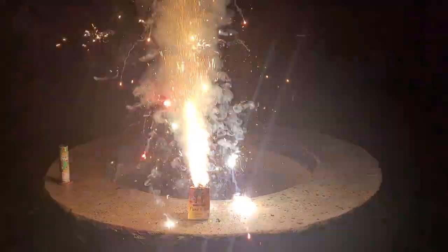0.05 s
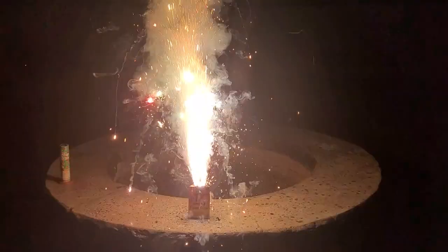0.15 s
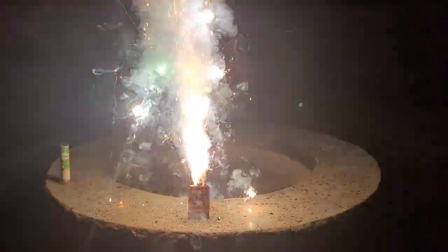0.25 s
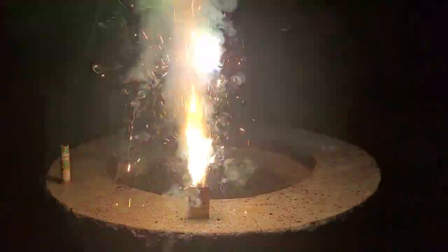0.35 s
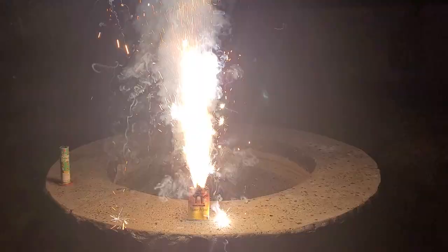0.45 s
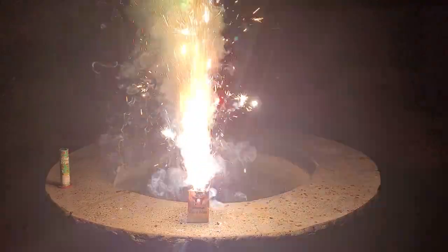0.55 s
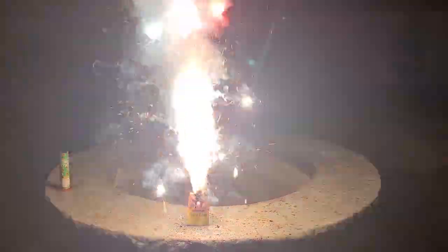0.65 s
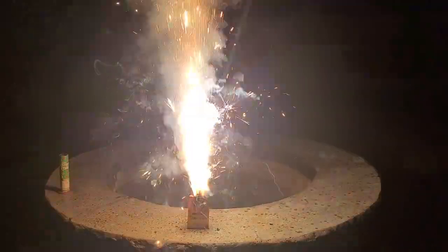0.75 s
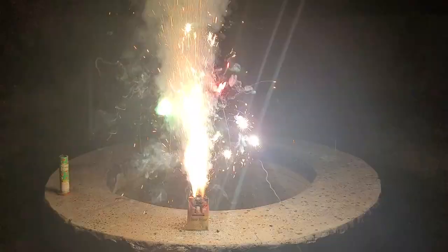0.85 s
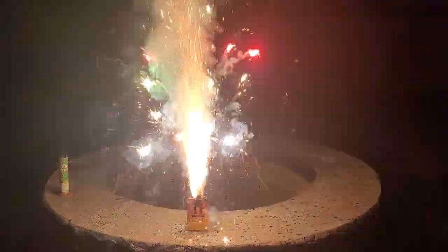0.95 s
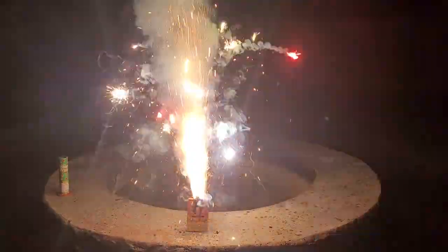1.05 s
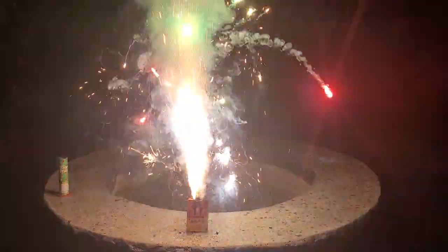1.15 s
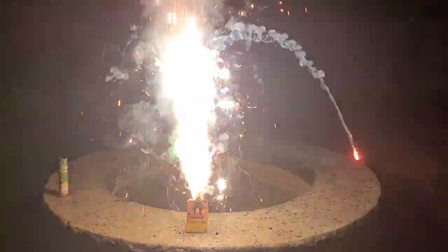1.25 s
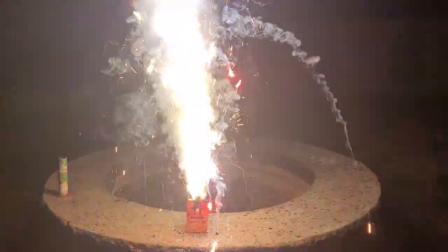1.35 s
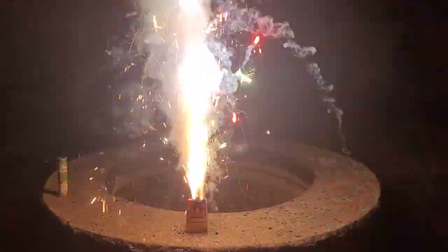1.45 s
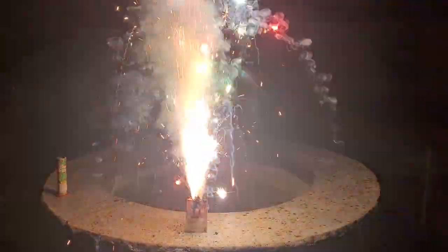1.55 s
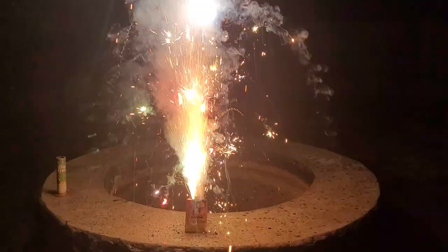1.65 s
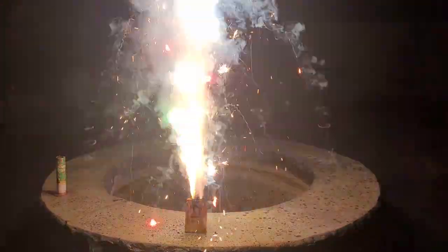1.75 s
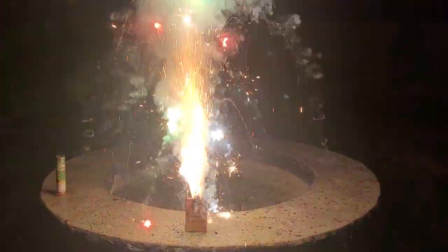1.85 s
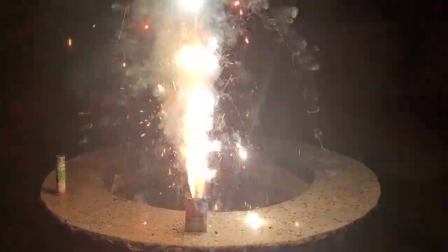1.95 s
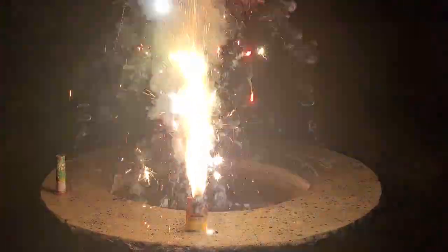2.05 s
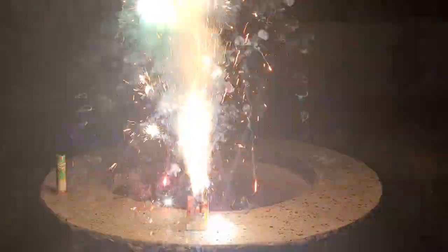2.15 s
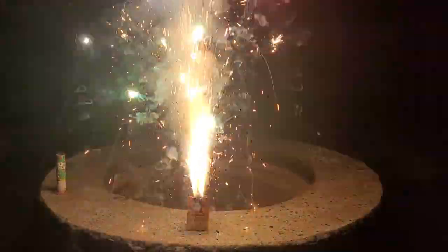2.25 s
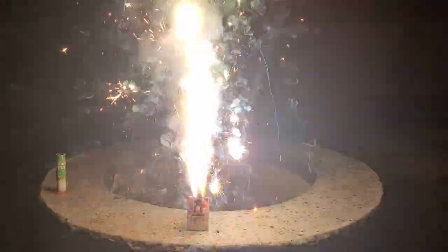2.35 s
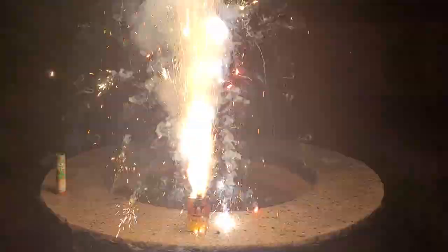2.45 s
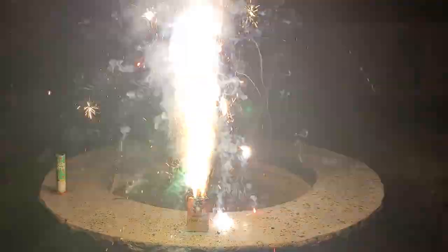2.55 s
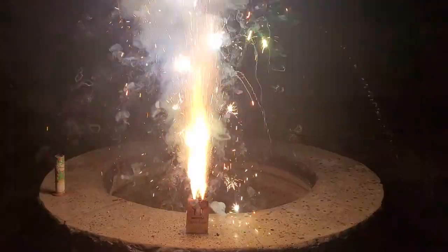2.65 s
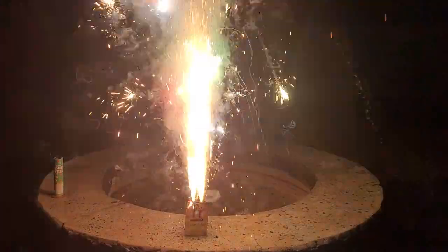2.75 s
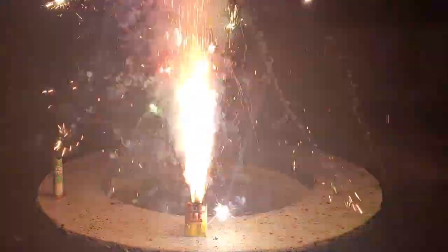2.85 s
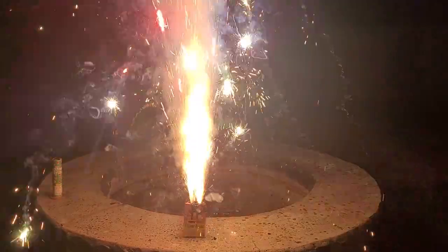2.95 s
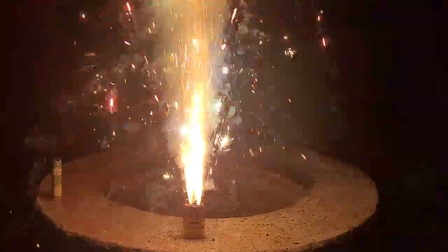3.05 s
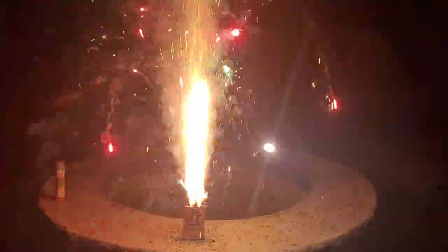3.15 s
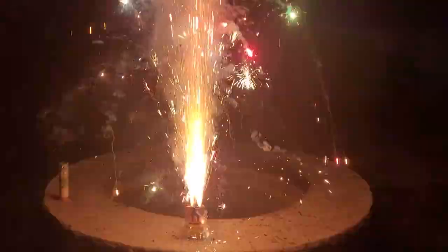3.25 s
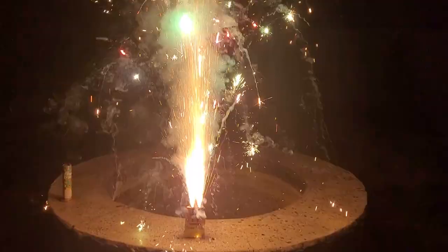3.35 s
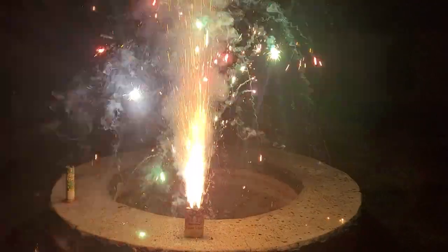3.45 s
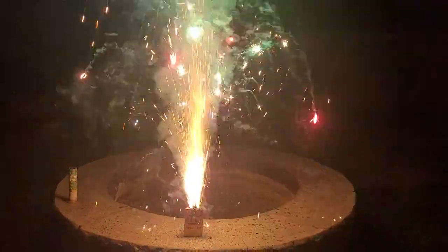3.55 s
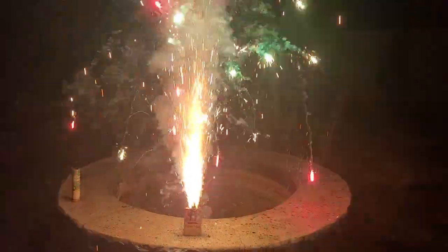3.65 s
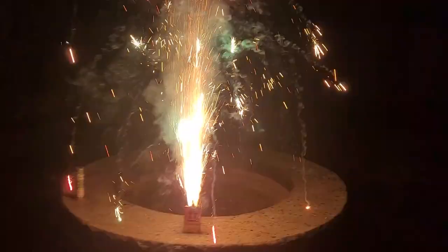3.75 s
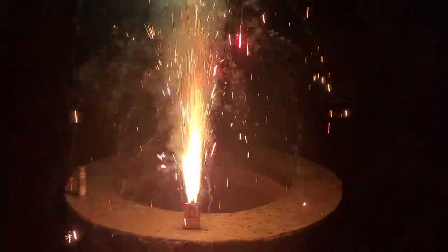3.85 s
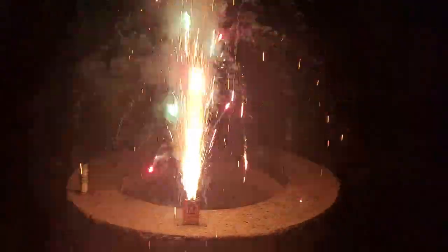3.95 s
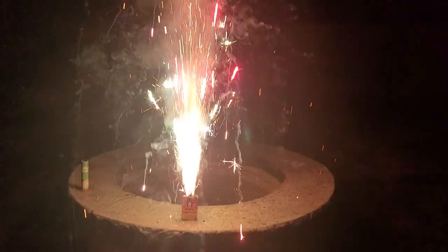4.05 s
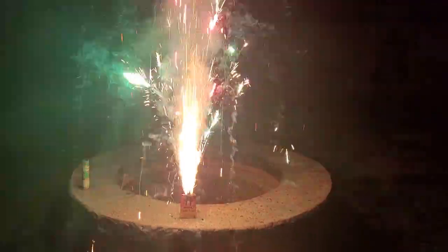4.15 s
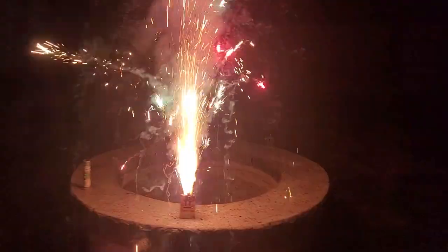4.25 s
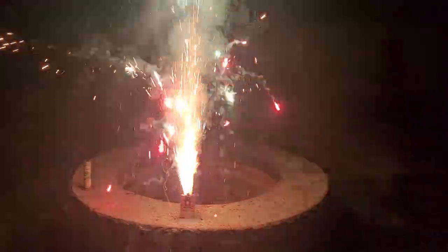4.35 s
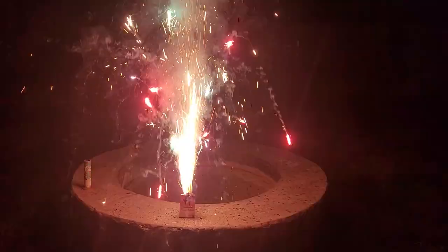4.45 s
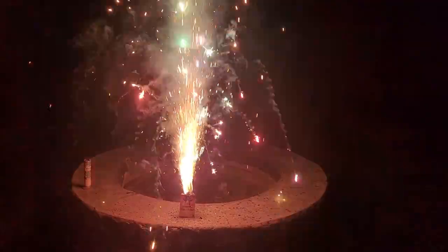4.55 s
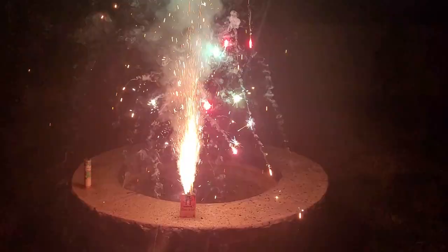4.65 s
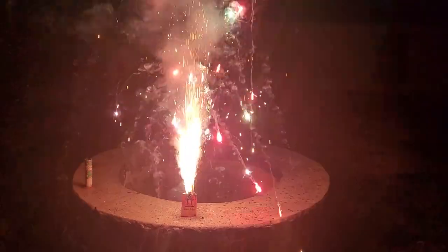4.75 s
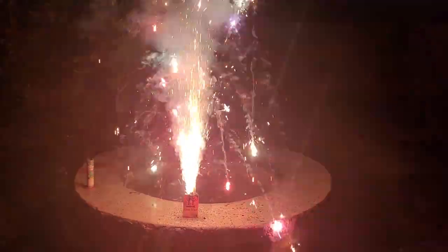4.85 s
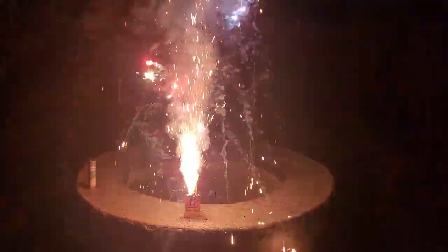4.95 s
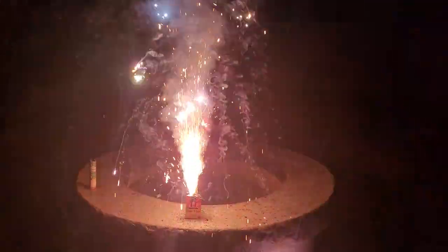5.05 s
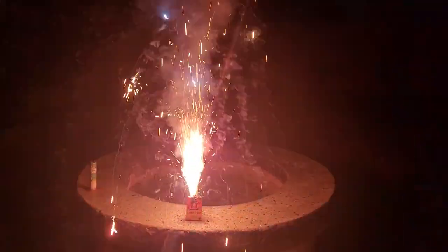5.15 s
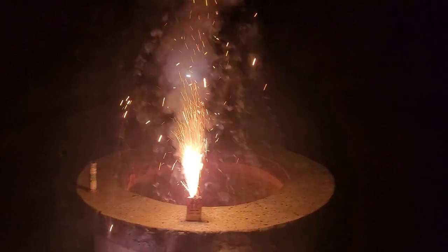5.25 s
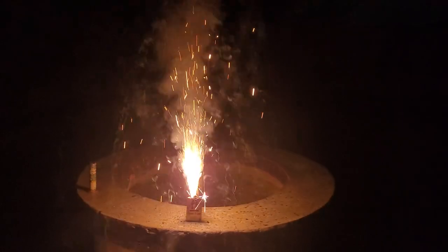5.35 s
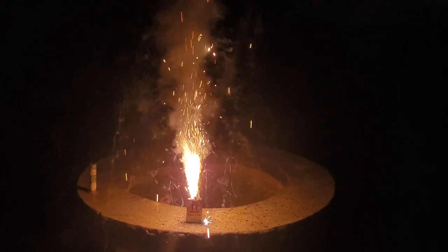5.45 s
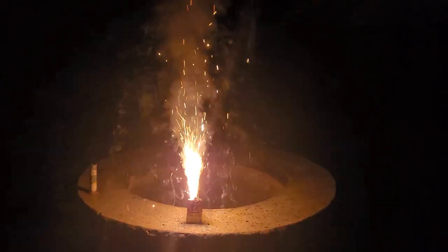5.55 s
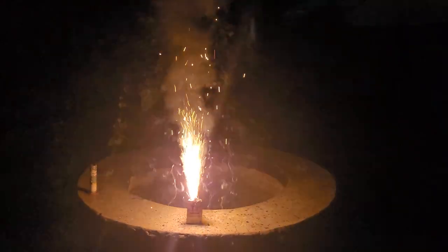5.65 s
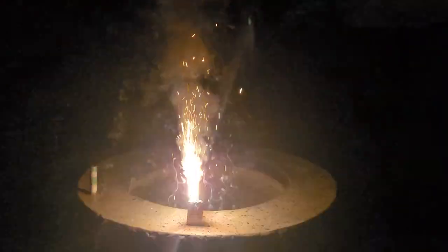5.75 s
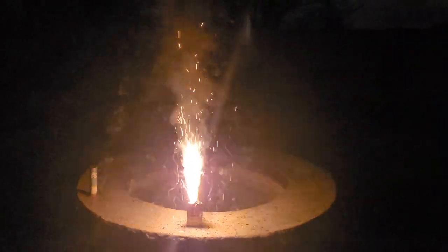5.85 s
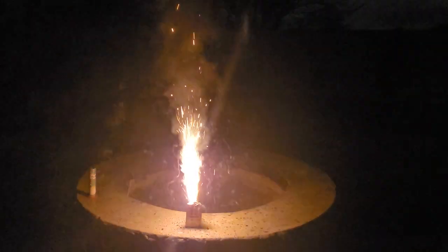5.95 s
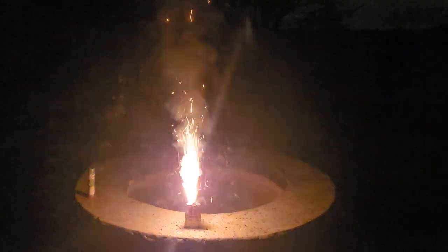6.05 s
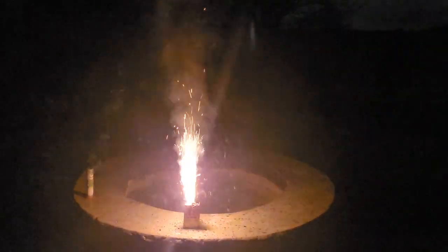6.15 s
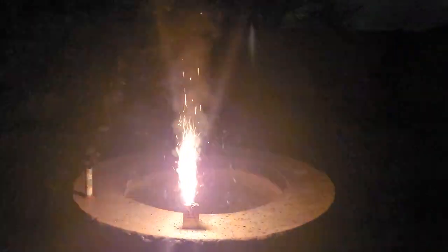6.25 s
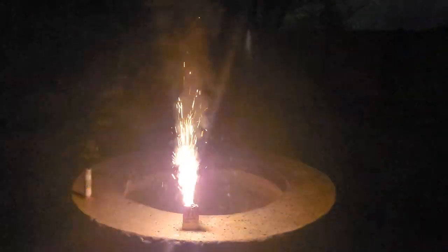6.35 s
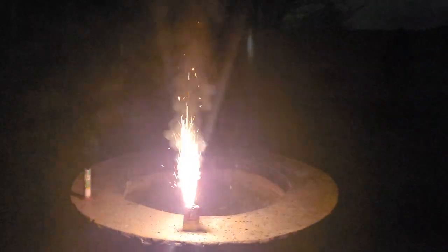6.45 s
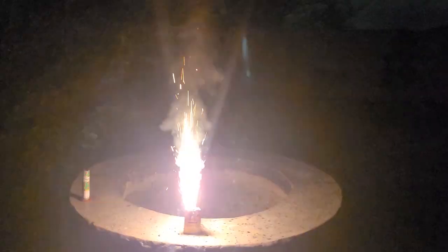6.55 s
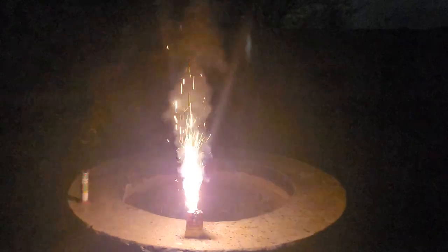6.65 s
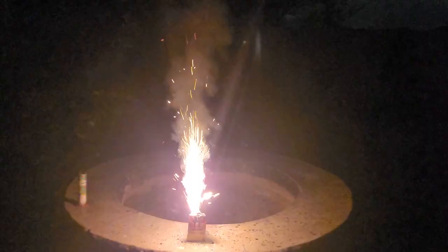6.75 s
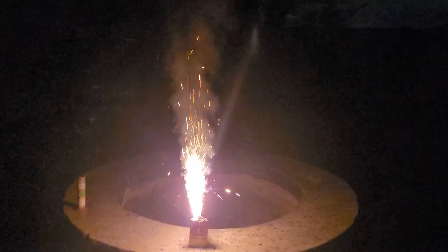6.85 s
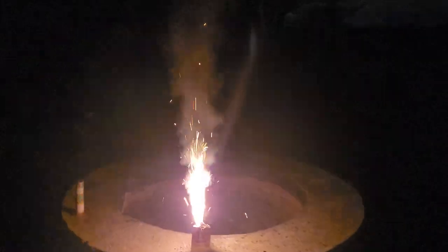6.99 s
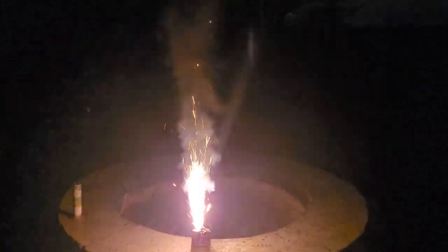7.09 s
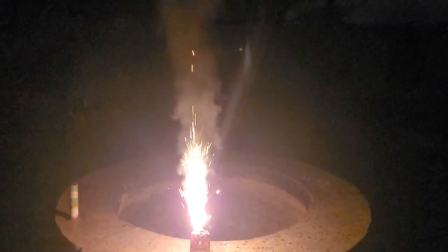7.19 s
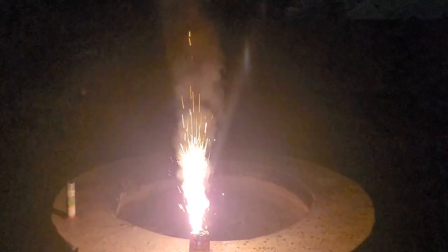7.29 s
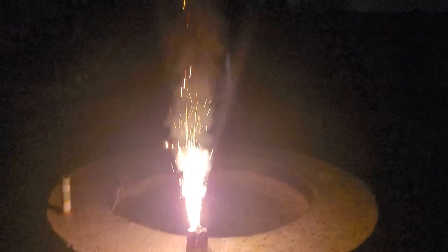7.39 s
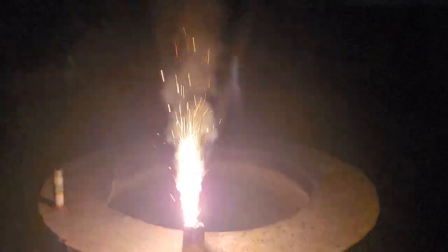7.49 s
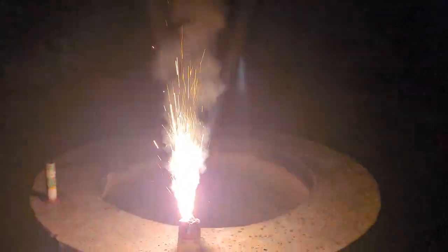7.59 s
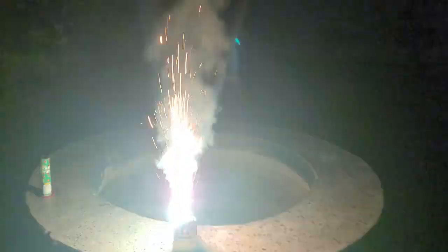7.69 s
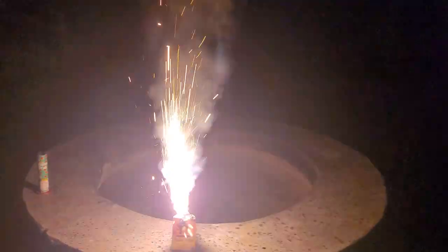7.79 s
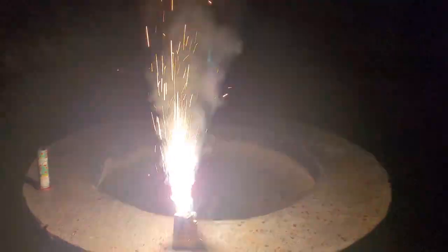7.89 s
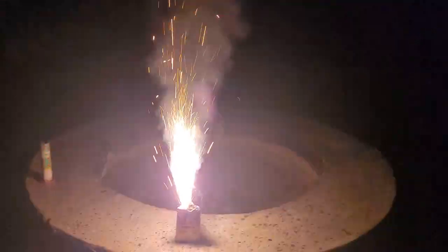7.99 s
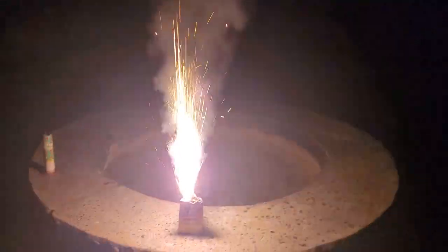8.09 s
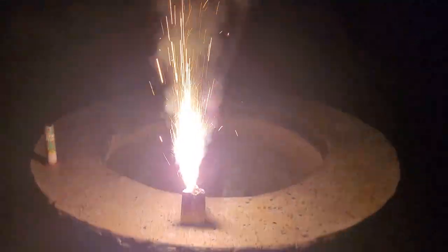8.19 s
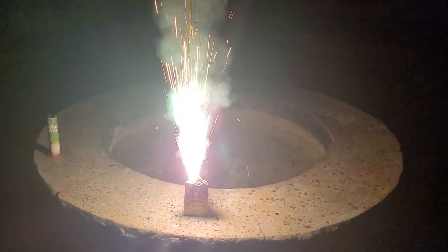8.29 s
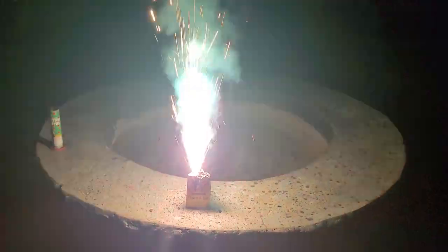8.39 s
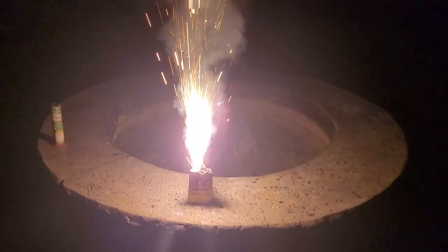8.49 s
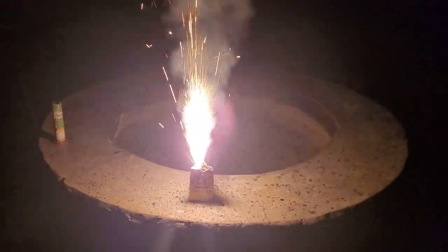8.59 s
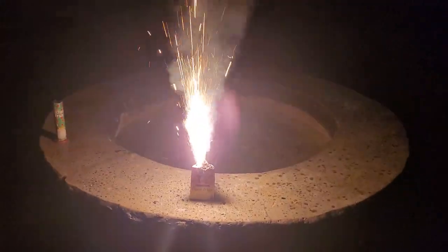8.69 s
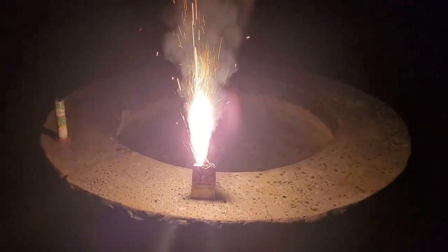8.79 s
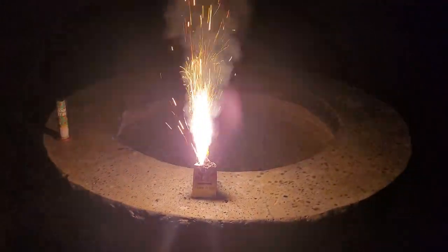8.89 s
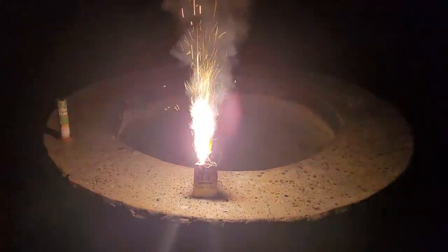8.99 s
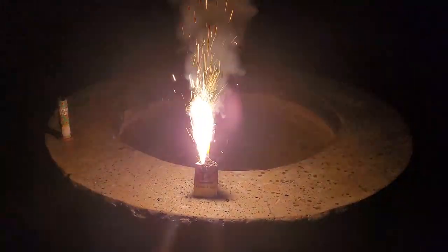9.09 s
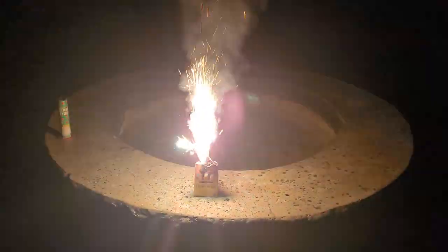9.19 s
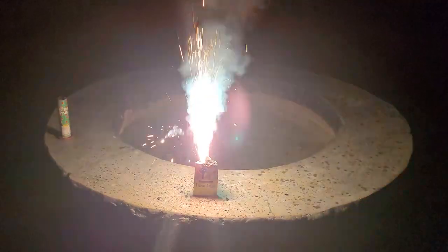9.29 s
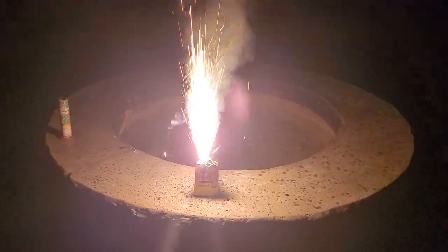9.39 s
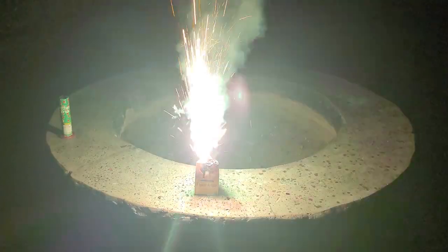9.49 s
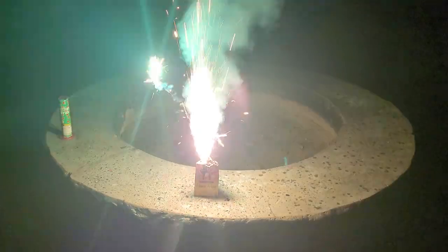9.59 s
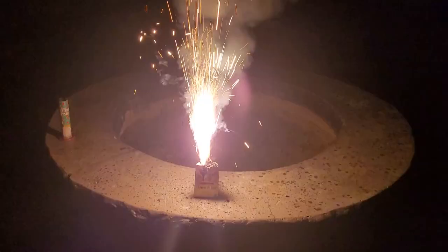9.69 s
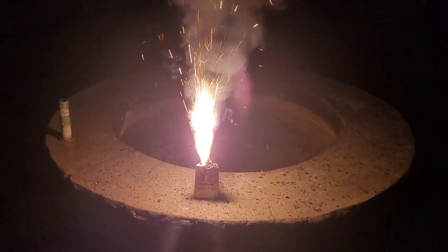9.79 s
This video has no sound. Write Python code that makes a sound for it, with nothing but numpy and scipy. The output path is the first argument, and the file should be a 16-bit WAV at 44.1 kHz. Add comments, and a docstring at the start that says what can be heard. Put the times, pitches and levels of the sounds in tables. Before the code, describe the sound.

Close outdoors, a ground firework sprays sparks with a hissing roar and small cracks, easing halfway and building again in spurts.

```python
"""A roar of gas and a bright sizzle, close up: a fountain firework on the concrete rim of a fire pit.
We stand outdoors, a step away, with a camera's two microphones. The turbulent jet is echoed by the
slab under it; burning grains sizzle in the plume and some burst with a sharp crack.
Halfway through, the wide crackling spray dies down and a narrower flame builds up in surges."""
import sys
import numpy as np
from scipy import signal
from scipy.fft import rfft, irfft, next_fast_len
from scipy.io import wavfile
from scipy.ndimage import map_coordinates

SR = 44100
rng = np.random.default_rng(int(sys.argv[2]) if len(sys.argv) > 2 else 0)


def digitize_waveform(pressure):
    """Quantize a signal to 16-bit integers and store it at the path in sys.argv[1].

    Rows of a 2-D input are taken as channels; values are limited to [-1, 1].
    """
    field = np.atleast_2d(pressure).T
    bounded = np.clip(field, -1, 1)
    quanta = np.round(bounded * 32767).astype(np.int16)
    wavfile.write(sys.argv[1], SR, quanta)


N = 433491
TIME = np.arange(N) / SR


# thrust of the gas jet: t/s, rush level/dB, low roar relative to the rush/dB
THRUST = [(0.0, -32, -1.5), (0.58, -37.5, 2.0), (1.04, -39.5, 1.5), (1.77, -40, 1), (2.9, -32.5, -0.5),
          (3.4, -32, -1), (3.75, -37.5, -1.5), (4.59, -42.5, -3.5), (4.79, -39.0, -1.5), (5.09, -42.0, 1.5),
          (5.49, -50.5, -1.5), (6.15, -50, -0.5), (6.62, -43.5, 1.5), (7.13, -50.5, 1.5), (7.68, -39, 2.5),
          (8.68, -37.5, 1.5), (8.92, -44, 2.0), (9.14, -47.0, 3), (9.47, -36.5, -2), (9.83, -42, 2.5)]
# the flame flares as a pocket of powder catches: t/s, length/s, rise/dB
POWDER_FLARES = [(.01, 0.12, 2), (1.19, 0.21, 4.5), (1.53, 0.16, 2.5), (2.08, .064, 3), (2.4, .16, 1.5),
                 (2.74, 0.095, 2), (3.33, .08, 2), (5.05, .047, 2), (6.57, .03, 3.5), (7.2, 0.19, 2.5),
                 (8.09, 0.082, 3.5), (8.21, 0.033, 5.5), (8.31, 0.046, 1), (8.39, 0.033, 4),
                 (8.66, 0.022, 2.5), (8.84, .05, 4.5), (9.02, .072, 3), (9.2, 0.079, 4), (9.37, 0.17, 4),
                 (9.59, 0.092, 4.5)]
def thrust(t):
    """The burning charge drives the jet: its level and the relative low roar, both in dB."""
    level_db, low_db = follow(THRUST, t)
    return level_db + surges(POWDER_FLARES, t), low_db


# spectra of the jet's low roar and its rush, a step away: f/Hz, level/dB
ROAR_SPECTRUM = [(15, -50), (25, -30), (40, -14), (58, 1.5), (78, -0.5), (105, -2), (150, -1.5),
                 (200, -5.5), (268, 7), (335, -1), (420, 1), (560, -2.5), (700, -26.5), (1100, -73)]
RUSH_SPECTRUM = [(150, -37), (550, -8.5), (660, -1.5), (780, -5), (1000, -1.5), (1250, -3), (1900, -1),
                 (2350, -5.5), (2800, -14), (3800, -18), (5000, -11), (8000, -25.5), (16000, -16.5)]
# how alike the jet is at the two microphones: f/Hz, coherence/0-1
JET_COHERENCE = [(30, 0.94), (300, 0.99), (800, 0.94), (1800, 0.74), (2600, 0.83), (3400, 0.15),
                 (5000, 0.65), (16000, 0.19)]
def jet(rush_db=0.3, roar_db=-1.18, rush_flutter_db=1.22, roar_flutter_db=1.0, hop=256):
    """Turbulent gas rushes and roars above the slab, fluttering as the powder burns unevenly."""
    t = np.arange(N // hop + 5) * hop / SR
    hz = np.fft.rfftfreq(4 * hop, 1 / SR)[:, None]
    a, b, c, d = rng.standard_normal((4, len(hz), len(t)))
    alike = at_frequency(JET_COHERENCE, hz)
    left = a + 1j * b
    right = alike * left + np.sqrt(1 - alike ** 2) * (c + 1j * d)
    combed = np.array([left, right]) * slab_echo(t, hz)
    gas = signal.istft(combed, nperseg=4 * hop, noverlap=3 * hop)[1][:, :N]
    level_db, low_db = thrust(TIME)
    flutter = wander(1.9, 47)
    rush = unit_centre(microphones(gas, RUSH_SPECTRUM)) * gain_of(rush_db + rush_flutter_db * flutter)
    roar = unit_centre(microphones(gas, ROAR_SPECTRUM))
    roar *= gain_of(roar_db + low_db + roar_flutter_db * flutter)
    return (rush + roar) * gain_of(level_db)


# shape of the plume: t/s, slab echo delay of the flame tip/ms, echo strength/0-1,
# scatter of the sparks between the microphones/ms
PLUME_SHAPE = [(0, 2.9, .35, .04), (1.3, 2.25, .5, .04), (2, 2.9, .35, .045), (3.2, 2.4, .45, .04),
               (3.7, 2.25, .6, .04), (4.3, 2.08, .8, .04), (5.1, 2.08, .8, .035), (5.5, 2.1, .8, .009),
               (6.7, 2.15, .85, .008), (7.3, 2.42, .75, .008), (8, 2.7, .7, .009), (9.3, 2.7, .7, .01),
               (9.83, 2.7, .7, .016)]
def slab_echo(t, hz, nozzle_ms=2.13, tip_share=0.65):
    """Concrete echoes comb the nozzle and flame tip; in a short flame both line up and sound hollow."""
    tip_ms, strength, _ = follow(PLUME_SHAPE, t)
    bounce = strength / (1 + (hz / 2600) ** 6)  # the flame is too large to comb short waves
    bounce *= hz ** 2 / (hz ** 2 + 280 ** 2)  # and the slab too small to throw back long ones
    nozzle, tip = (abs(1 + bounce * np.exp(-2j * np.pi * hz * ms / 1000)) ** 2
                   for ms in (nozzle_ms, tip_ms))
    return np.sqrt(((1 - tip_share) * nozzle + tip_share * tip) / (1 + bounce ** 2))


# flow of sparks from the nozzle: t/s, sizzle level/dB, extra for the coarse grains/dB
SPARK_FLOW = [(0, -32.5, -0.5), (.22, -33, 0), (1.4, -31, 0), (2.41, -29.5, 0.5), (2.9, -32, 4),
              (3.3, -31.5, 3), (3.39, -35.5, 6), (3.55, -34.5, -0.5), (3.83, -34, 0.5), (3.86, -42, 4),
              (4.11, -35, -0.5), (4.59, -38, 1), (5.07, -38.5, -3), (5.5, -51.5, -2.5), (6.42, -51, -2.5),
              (7.86, -47.5, -2), (8.2, -46.5, 0.5), (8.63, -47, -1.5), (8.98, -49.5, -2),
              (9.62, -45.5, -4.5), (9.83, -50, -2)]
# a batch of sparks is thrown out at once: t/s, length/s, rise/dB
SPARK_SPURTS = [(0, 0.17, 3), (.51, 0.037, 3.5), (.68, .03, 3), (.91, 0.062, 1.5), (1.53, .12, 2),
                (1.88, .09, 2), (2.11, 0.079, 3), (2.35, .098, 2.5), (2.91, .05, 3.5), (5.1, .025, 3.5),
                (6.56, .042, 3.5), (6.73, 0.16, 4), (6.96, 0.026, 2), (7.19, 0.18, 3), (7.61, .03, 4),
                (7.75, 0.067, 4), (8.27, 0.13, 2), (8.39, 0.071, 4.5), (9.06, 0.23, 2.5), (9.4, .03, 6),
                (9.49, 0.055, 7), (9.6, 0.11, 5.5)]
def spray(t):
    """Sparks leave in a stream with spurts: its level and the coarse grains' extra, both in dB."""
    level_db, extra_db = follow(SPARK_FLOW, t)
    return level_db + surges(SPARK_SPURTS, t), extra_db


# spectra of the fine and the coarse sparks, a step away: f/Hz, level/dB
FINE_SPECTRUM = [(300, -11.5), (1800, -11), (2800, -11.5), (4000, -16), (7000, -3.5), (8600, -16),
                 (10500, -6), (11500, -4.5), (13000, 0), (14500, 1), (15600, 4.5), (16200, -6)]
COARSE_SPECTRUM = [(300, -33), (2600, -6.5), (4100, -11), (4900, -3.5), (6300, -6), (7100, -6),
                   (8500, -11.5), (11000, -10), (16000, -58)]
def sparks(fine_db=1.23, coarse_db=-3, clump_db=1.3, coarse_clump_db=0.8, batch_db=1.2, jet_share=0.31):
    """Fine grains sizzle and coarse ones, partly driven by the jet, spit; both leave in the same clumps."""
    level_db, extra_db = spray(TIME)
    drive_db = jet_share * (thrust(TIME)[0] - level_db) + extra_db
    clump, batch = wander(10, 110), wander(8, 12)
    fine = unit_centre(microphones(grains(per_s=6000, spread_db=3.0, hiss=0.38), FINE_SPECTRUM))
    fine *= gain_of(fine_db + clump_db * clump + batch_db * batch)
    coarse = unit_centre(microphones(grains(per_s=8000, spread_db=2.5, hiss=0.4), COARSE_SPECTRUM))
    coarse *= gain_of(coarse_db + drive_db + coarse_clump_db * clump + batch_db / 2 * batch)
    return near_echo(fine + coarse) * gain_of(level_db)


def grains(per_s, spread_db, hiss):
    """Burning grains click, each from its own place in the plume, so with its own lag left to right."""
    at = np.flatnonzero(rng.random(N) < per_s / SR)
    size = gain_of(spread_db * np.minimum(rng.exponential(1, N), 5)) * rng.choice([-1, 1], N)
    scatter_ms = follow(PLUME_SHAPE, TIME)[2]
    lag = np.round(rng.standard_normal(N) * scatter_ms * SR / 1000).astype(int)
    left = np.bincount(at, size[at], N)
    right = np.bincount(np.clip(at + lag[at], 0, N - 1), size[at], N)
    return unit_rms(np.array([left, right])) + hiss * rng.standard_normal((2, N))  # the smallest merge


# the loudest grains that burst: t/s, level/dB, f/Hz, ring/cycles, spatter/ms
LOUD_BURSTS = [(0.1675, -8, 10600, .7, .6), (0.547, -8, 10700, .7, .6), (0.9843, -13, 6500, .7, .6),
               (1.1238, -8, 12100, .7, .6), (1.188, -11, 8900, .7, .6), (1.2329, -7, 10900, .7, .6),
               (1.4622, -13, 6800, .7, .6), (1.6584, -7, 11800, .7, .6), (1.8026, -3, 12000, .7, 1.8),
               (1.9177, -7, 11600, .7, .6), (2.6464, -3.5, 11000, .7, 1.8), (3.1963, -7, 9900, .7, .6),
               (3.2526, -8, 5700, .7, .6), (3.8266, -11, 11600, .7, .6), (4.1138, -13, 12100, .7, .6),
               (4.2918, -12, 10000, .7, .6), (4.7765, -5, 11000, .7, 1.2), (4.8575, -13, 10800, .7, .6),
               (5.0876, -15, 11300, .7, 4), (5.0944, -19, 2000, .7, 4), (5.1227, -16.5, 11900, .7, .6),
               (5.302, -20, 9100, .7, .6), (5.4225, -19, 10200, .7, 1.8), (5.4505, -22.5, 11100, .7, .6),
               (5.6895, -24, 13400, .7, .6), (5.8699, -26, 5700, 3, 1.2), (6.9903, -24, 10500, .7, .6),
               (7.6278, -22, 8000, .7, .6), (8.4763, -17, 11300, .7, .6), (9.1156, -21, 11300, .7, .6)]
# colour laid over every burst: f/Hz, level/dB
BURST_SPECTRUM = [(200, -20), (1800, 3), (3300, 0), (5500, 6), (7000, 3), (8600, -4), (11000, 1),
                  (13000, 5.5), (16000, 5.5)]
def pops(debris_db=-11, length=1024):
    """Each bursting grain gives a very short crack and a spatter of fragments."""
    t = np.arange(length) / SR
    out = np.zeros((2, N + length))
    for s, db, hz, cycles, spatter_ms in list(LOUD_BURSTS) + crackle():
        crack = np.exp(-t * hz / cycles) * np.cos(2 * np.pi * hz * t)
        debris = gain_of(debris_db) * np.exp(-1000 * t / spatter_ms) * rng.standard_normal((2, length))
        start = round(s * SR)
        out[:, start:start + length] += gain_of(db) * (crack + debris)
    return microphones(out[:, :N], BURST_SPECTRUM)


def crackle(per_s=3, over_spray_db=19, spread_db=2, pitch_hz=9500):
    """Rows for lesser grains that burst at random, their level following the spray that carries them."""
    times = np.flatnonzero(rng.random(N) < per_s / SR) / SR
    size, detune = rng.standard_normal((len(times), 2)).T
    levels_db = spray(times)[0] + over_spray_db + spread_db * size
    pitches = pitch_hz * (1 + .15 * detune)
    return [(s, db, hz, .7, .6) for s, db, hz in zip(times, levels_db, pitches)]


# a reflection close to the microphones: t/s, delay/ms, strength/0-1
NEAR_REFLECTION = [(5, .26, 0), (5.7, .258, .25), (6.3, .265, .3), (7.6, .265, .38), (8.15, .256, .32),
                   (8.6, .265, .27), (9.4, .273, .32)]
def near_echo(x):
    """A reflection close to the camera hollows the narrow flame's hiss; it sweeps as the hand moves."""
    ms, strength = follow(NEAR_REFLECTION, TIME)
    position = np.arange(N) - ms * SR / 1000
    late = np.array([map_coordinates(side, [position], order=3) for side in x])
    return (x - strength * late) / np.sqrt(1 + strength ** 2)


# shading between the two microphone ports: f/Hz, left minus right level/dB
PORT_BALANCE = [(60, -1), (250, 0.5), (750, -1.5), (1250, -4.5), (2300, -5), (2800, 1), (3350, 15.5),
                (4100, -0.5), (5200, -3), (6400, -6), (7600, -1), (11500, -1), (13200, -5), (16000, -5.5)]
# how far the left port leads: f/Hz, phase/rad
PORT_LEAD = [(0, 0), (1500, .15), (2200, .9), (3200, 3), (3500, 5.2), (4500, 6.3), (6200, 7), (7000, 8),
             (7500, 9.2), (7900, 6.5), (10200, 7.5), (11300, 9.4), (12000, 12.2), (16000, 16)]
def microphones(x, spectrum):
    """Gives a pair its source's spectrum; the camera body shades and delays each port differently."""
    size = next_fast_len(N + 4096)
    hz = np.fft.rfftfreq(size, 1 / SR)
    ratio, lead = gain_of(at_frequency(PORT_BALANCE, hz)), at_frequency(PORT_LEAD, hz)
    ports = np.array([ratio, np.exp(-1j * lead)]) * np.sqrt(2 / (1 + ratio ** 2))
    colour = gain_of(at_frequency(spectrum, hz))
    return irfft(rfft(x, size) * ports * colour, size)[:, :N]


def surges(rows, t, attack_s=0.017, release_s=0.039):
    """Decibels added by flares or spurts, which catch quickly, hold, and burn out."""
    return sum(db * np.clip(np.minimum((t - s) / attack_s, 1 + (s + length - t) / release_s), 0, 1)
               for s, length, db in rows)


def wander(slow_hz, fast_hz):
    """Random drift of rms 1 between two rates."""
    hz = np.fft.rfftfreq(N, 1 / SR)
    shape = hz / (hz + slow_hz) ** 1.5 / (1 + (hz / fast_hz) ** 2)
    return unit_rms(irfft(rfft(rng.standard_normal(N)) * shape, N))


def follow(rows, t):
    """Each column of a curve table at the times t."""
    s, *columns = np.transpose(rows)
    return [np.interp(t, s, column) for column in columns]


def at_frequency(points, hz):
    """A spectrum joined by straight lines over log frequency."""
    f, value = np.transpose(points)
    return np.interp(np.log(hz + 1), np.log(f + 1), value)


def gain_of(db):
    """Decibels to amplitude."""
    return 10 ** (np.asarray(db) / 20)


def unit_rms(x):
    """Scales to rms 1."""
    return x / np.sqrt(np.mean(x ** 2) + 1e-20)


def unit_centre(x):
    """Scales a pair so that its centre has rms 1."""
    return x / np.std(x.mean(0))


def scene():
    """Jet, sparks and pops in the open air, a step from the microphones."""
    return jet() + sparks() + pops()


def record(dry, edge_hz=15900):
    """The camera's band limit cuts off the highest treble."""
    low_pass = signal.firwin(601, edge_hz, window=("kaiser", 9), fs=SR)
    return signal.oaconvolve(dry, low_pass[None], "same")


dry = scene()
out = record(dry)
digitize_waveform(out)
```